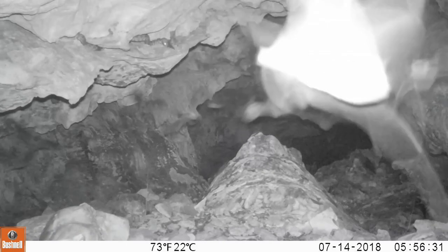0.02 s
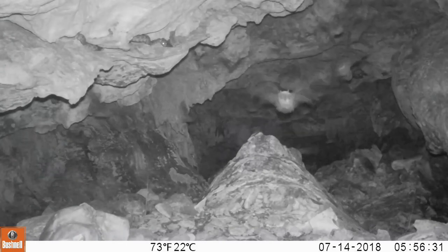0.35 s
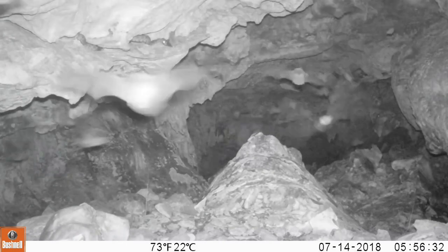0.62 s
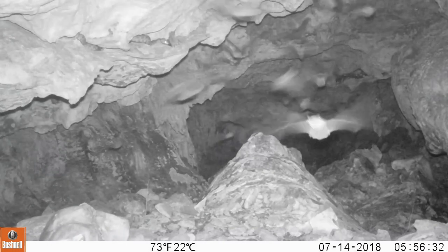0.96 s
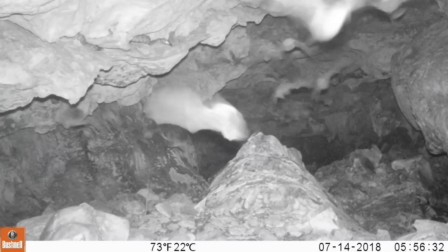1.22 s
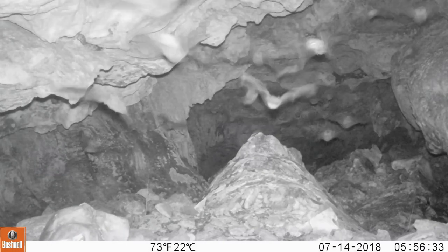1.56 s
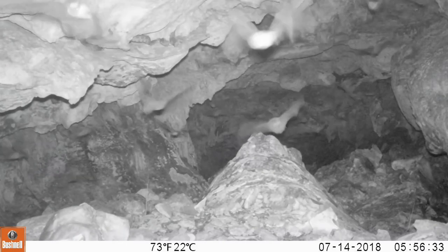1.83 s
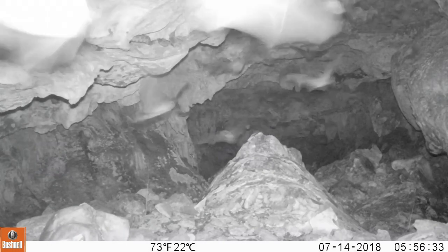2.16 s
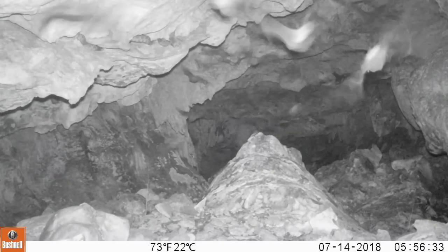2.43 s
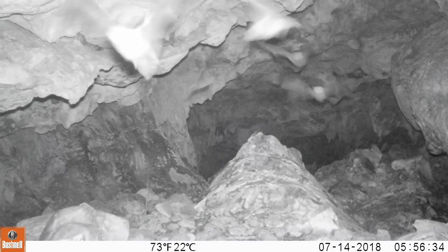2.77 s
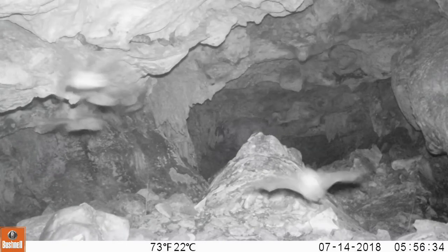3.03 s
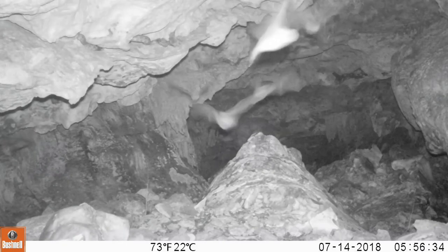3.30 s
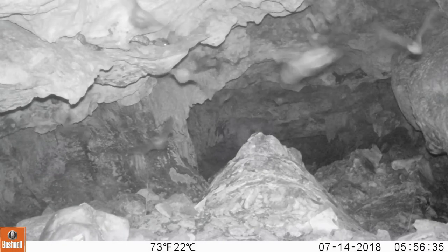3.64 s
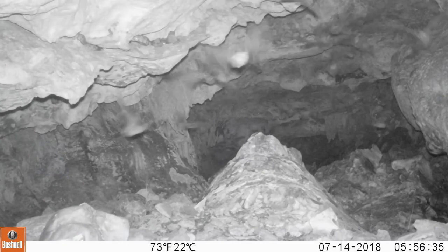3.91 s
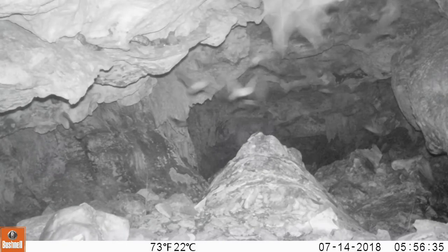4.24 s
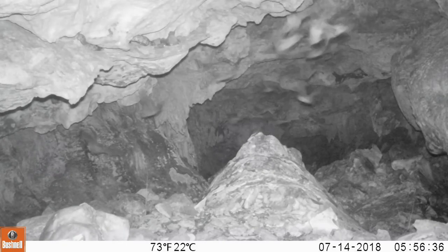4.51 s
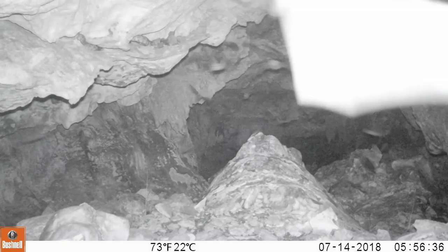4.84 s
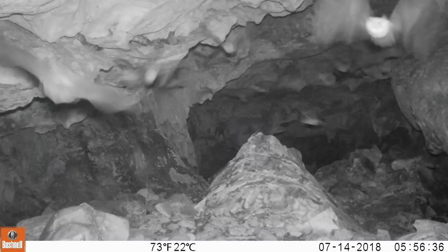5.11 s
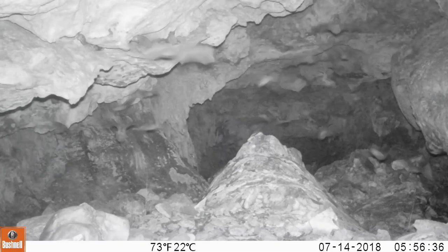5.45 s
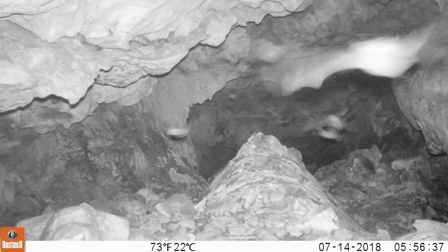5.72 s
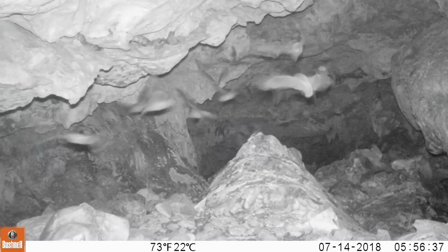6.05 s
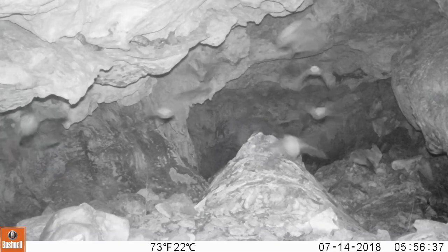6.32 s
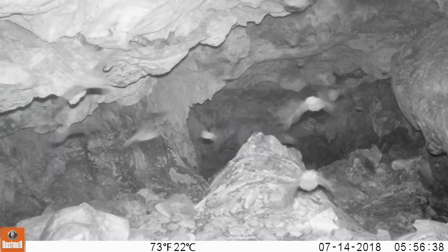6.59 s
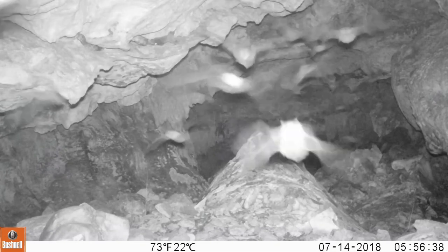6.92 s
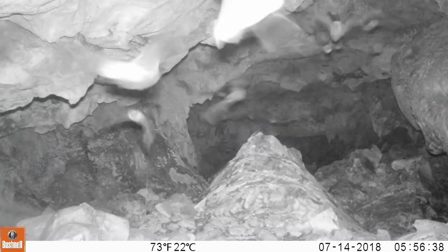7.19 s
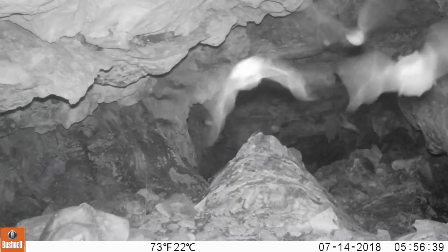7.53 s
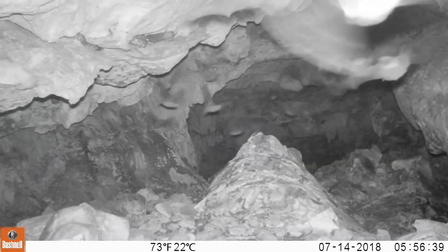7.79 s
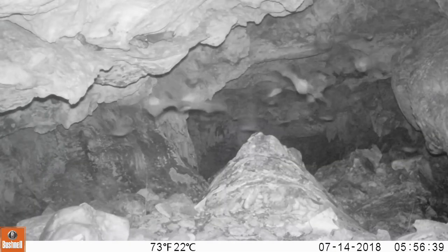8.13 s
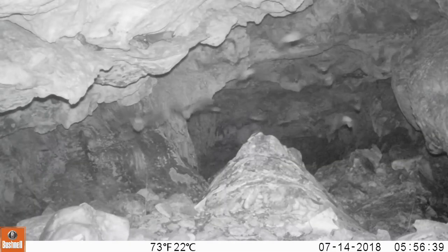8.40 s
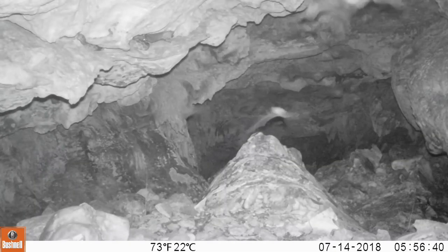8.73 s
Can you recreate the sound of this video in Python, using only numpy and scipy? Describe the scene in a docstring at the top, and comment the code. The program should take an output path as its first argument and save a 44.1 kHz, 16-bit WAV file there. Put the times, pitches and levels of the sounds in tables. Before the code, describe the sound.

Bats fly past a small microphone in a cave for about nine seconds. From the start, each close pass is a quick train of bright, papery swishes that swells and fades, with dry snaps of wing skin, over the fluttering rush of a more distant flock. The passes are dense through the first 3 seconds, ease briefly, then return around 4.3 to 5.8 seconds and 6.2 to 7.5 seconds. Between 0.6 and 1.3 seconds one bat makes a run of eight sharp clicks. Thin high ticks and faint chirping pips come and go afterwards. Two loud, very short falling squeaks stand out at 3.7 and 7.6 seconds. The flock thins after about 8 seconds, with a few softer passes. The rock adds a brief, close ring, and a low rumble of moving air and steady microphone hiss lie underneath throughout.

```python
"""Inside a rock chamber, a small trail camera stands close to a stream of bats.
From the start, bats pass near the microphone, each beating a short train of swishes; some wings snap
taut. Around 1 s one bat clicks, then thin ticks and pips from the roost come and go. Two loud squeaks
sound at 3.7 s and 7.6 s, and the flutter of the flock further off thins towards the end.
The rock rings briefly; low moving air and the hiss of the microphone lie under it all."""
import sys
import numpy as np
from scipy import signal
from scipy.fft import rfft, irfft
from scipy.io import wavfile
from scipy.ndimage import uniform_filter1d

SR = 44100
rng = np.random.default_rng(int(sys.argv[2]) if len(sys.argv) > 2 else 0)


def wav_record(signal):
    """Record a signal, one row per channel, as 16-bit PCM in the file named by sys.argv[1]."""
    frames = np.transpose(np.atleast_2d(signal))
    bounded = np.clip(frames, -1, 1)
    # unit amplitude maps onto the largest positive 16-bit level
    quanta = np.round(bounded * 32767).astype(np.int16)
    wavfile.write(sys.argv[1], SR, quanta)


N = 390726
TIME = np.arange(N) / SR
# spectrum of a wing close to the microphone: frequency_hz, density_db
NEAR_WING = [(40, -18), (150, 0), (430, -10), (620, -6), (850, -8.5), (1300, -7), (1900, -12), (3100, -7.5),
             (4400, -7), (6500, 2), (8000, -2), (10000, -5), (12000, -13.5), (15300, -34)]


def passes(crinkle_db=2.7, patchy_db=4.5, crest=.36, uneven_db=.6, beats_each_side=4):
    """A bat beats steadily past the microphone: swells of rushing air, grainy where the skin crinkles."""
    # close bats: nearest_s, wingbeats_per_s, time_to_3_db_down_s, stroke_s, level_db, puff_db, edge_db
    close_bats = [(0.021, 14.1, 0.05, 0.052, -51.0, 0.0, -1.0), (0.083, 11, 0.05, 0.04, -55.0, 5.5, 1.0),
                  (0.43, 11, 0.04, 0.05, -54.0, 6.0, -1.5), (0.556, 12.5, 0.03, 0.052, -49.0, -2.0, 3.5),
                  (1.058, 14.5, 0.05, 0.052, -56.5, 4.5, 0.0), (1.506, 8.7, 0.05, 0.04, -46.5, -5.0, -9.0),
                  (1.728, 12, 0.04, 0.028, -52.5, -3.5, -1.5), (1.957, 13.1, 0.12, 0.042, -59.0, 4.5, 2.5),
                  (2.462, 13, 0.04, 0.028, -49.0, -2.5, -10.0), (2.656, 14.5, 0.12, 0.038, -47.0, 0.0, 0.5),
                  (2.775, 9.9, 0.05, 0.026, -52.0, 6.5, 1.5),
                  (3.146, 10.3, 0.02, 0.028, -46.5, -4.5, -10.0), (4.1, 12, 0.03, 0.04, -57.0, -7.5, -7.0),
                  (4.428, 12.1, 0.03, 0.052, -52.5, 6.5, -2.0), (4.93, 10.9, 0.12, 0.033, -54.0, 0.0, -3.5),
                  (5.025, 14, 0.04, 0.04, -54.5, -1.0, 0.5), (5.737, 14.5, 0.05, 0.04, -51.5, 1.5, 2.0),
                  (6.203, 14.1, 0.05, 0.052, -57.0, 5.0, -8.0),
                  (6.369, 8.5, 0.05, 0.052, -55.0, -1.5, -3.5), (6.555, 11, 0.03, 0.025, -58.5, 9.0, 0.0),
                  (6.856, 14.5, 0.03, 0.042, -56.5, 6.5, 10.0), (7.056, 13, 0.03, 0.03, -59.5, 5.5, 9.5),
                  (7.19, 14.5, 0.05, 0.042, -59.0, 2.0, 4.5), (7.228, 11.9, 0.03, 0.052, -58.5, 2.5, 7.0),
                  (7.455, 12.1, 0.05, 0.052, -50.5, 0.0, -3.5),
                  (8.128, 14.1, 0.05, 0.052, -65.0, 12.0, 9.0),
                  (8.421, 11.1, 0.03, 0.033, -55.5, -1.5, -2.0),
                  (8.741, 13.1, 0.015, 0.052, -61.0, 1.0, 8.5)]
    power = np.zeros((3, N))
    beats = np.arange(-beats_each_side, beats_each_side + 1)
    for nearest_s, rate, near_s, stroke_s, *levels in close_bats:
        progress = np.linspace(0, 1, int(stroke_s * SR))
        arch = np.sin(np.interp(progress, [0, crest, 1], [0, np.pi / 2, np.pi]))
        stroke = band_gains(*levels)[:, None] * unit(abs(arch) ** 1.1)
        for offset_s, effort in zip(beats / rate, rng.standard_normal(len(beats))):
            distance = np.hypot(1, offset_s / near_s)  # 1 at the nearest point
            if nearest_s + offset_s > 0:
                swell = stroke * amp(uneven_db * effort) / distance
                add(power, nearest_s + offset_s - stroke_s / 2, swell ** 2)
    air = unit(rng.standard_normal(N) * amp(crinkle_db * wander(300)))
    return dapple(wing_tone(np.sqrt(power) * air, NEAR_WING), patchy_db)


def snaps(gain_db=-1.0, colour_spread_db=7.0, soft_count=45):
    """Slack wing skin pulls taut with a dry crack: loud ones close by, soft ones all through the flock."""
    # the loudest snaps of a wing membrane: start_s, level_db, puff_db, edge_db
    close_snaps = [(0.0827, -44, 3, -8), (0.1211, -44.5, -7, 0), (0.403, -43, 2, -10),
                   (0.5008, -40, -6, 0.5), (0.758, -45, -20, -10), (2.1274, -47, -1.5, -4),
                   (2.3725, -45.5, 5, -7), (2.5056, -47, 3, -7), (2.5155, -43.5, -12, -3),
                   (2.5816, -42, 1, -3), (2.6845, -40, -2, -20), (2.7655, -49.5, 3, -3),
                   (2.7908, -41, -14, -12), (3.1355, -45, 1, -5), (3.7862, -45, -10, -24),
                   (4.32, -37, -15, -15), (4.4106, -43, -1, -10), (4.4553, -39.5, -9, -15),
                   (4.704, -44.5, 2, -3), (4.9087, -45.5, -10, -13), (5.003, -42, 0.5, -10),
                   (5.025, -44, -13, -5), (5.035, -43.5, -15, -10), (5.094, -42.5, -7.5, -10),
                   (5.1941, -48, -7, 1), (5.44, -48, -10, -10), (5.6, -42.5, -9, -4),
                   (5.672, -47.5, 9, -12), (6.014, -64, 24, 13), (6.8702, -39.5, -12, -5),
                   (7.4716, -37.5, -20, -0.5), (7.6929, -42.5, 1.5, -26), (8.044, -66, 21, 0),
                   (8.111, -59, 19, -3)]
    when, size, puff, edge = rng.random((soft_count, 4)).T
    when = when * N / SR
    soft_db = throng(when)[0] + 3.0 + 4.5 * size  # just above the flock's rustle
    puff_db = -1.0 + colour_spread_db * (2 * puff - 1)
    edge_db = 3.0 + colour_spread_db * (2 * edge - 1)
    bands = np.zeros((3, N))
    for start_s, *levels in close_snaps + list(zip(when, soft_db, puff_db, edge_db)):
        add(bands, start_s + .0005, band_gains(*levels)[:, None] * crack(spike=1.36))
    return amp(gain_db) * wing_tone(bands, NEAR_WING)


def squeaks(harmonics=4):
    """A short falling cry turns raspy at its end; harmonics flare as they cross the throat's resonances."""
    # cries: start_s, length_s, first_pitch_hz, last_pitch_hz, level_db, overtones_db, end_jitter_ratio
    cries = [(3.7336, 0.0181, 2450, 1970, -33, 5.0, .09), (7.5798, 0.0163, 2282, 1930, -36, -0.5, .06),
             (5.303, 0.021, 2290, 1950, -54.5, -22, .15), (1.375, 0.019, 2200, 1900, -54.5, -20, .15)]
    # resonances of a bat's throat: centre_hz, width_hz, gain_db
    resonances = [(2325, 320, 5), (4000, 460, 3), (6630, 1600, -9.5), (8800, 1200, -22)]
    out = np.zeros(N)
    for start_s, length_s, first_hz, last_hz, db, overtones_db, rasp in cries:
        progress = np.linspace(0, 1, int(length_s * SR))
        pitch = first_hz + (last_hz - first_hz) * (2 * progress + progress ** 5) / 3
        jitter = (.005 + rasp * progress ** 4) * wander(1200)[:len(progress)]
        phase = 2 * np.pi * np.cumsum(pitch * (1 + jitter)) / SR
        cry = 0
        for k in range(1, harmonics + 1):
            throat = sum(amp(gain_db) / (1 + (2 * (k * pitch - hz) / width) ** 2)
                         for hz, width, gain_db in resonances)
            cry = cry + throat * amp(overtones_db * (k > 1)) * np.sin(k * phase)
        add(out, start_s, amp(db) * unit(cry * signal.windows.tukey(len(progress), .4)))
    return out


def clicks(gain_db=-1.0, echo_s=.0165, echo_db=-5.5, fall=.12, length_s=0.0075, harmonics=8):
    """Sharp calls, a falling stack of harmonics in noise, each thrown back once by a rock face."""
    # clicks of a bat sounding its way: start_s, pitch_hz, level_db
    calls = [(0.6306, 1566, -52.5), (0.7162, 1594, -51), (0.781, 1913, -43.5), (0.8642, 2100, -45),
             (0.9628, 2120, -48), (1.1199, 1562, -40.5), (1.216, 1490, -48), (1.3052, 1720, -51)]
    # tone colour of a click: frequency_hz, gain_db
    spectrum = [(500, -33), (1200, -11), (1800, -3.5), (3000, -5), (4500, -5.5), (7000, 3), (10000, -0.5),
                (13000, -7.5), (15300, -21)]
    out, t = np.zeros(N), np.arange(int(length_s * SR)) / SR
    for start_s, hz, db in calls:
        phase = 2 * np.pi * np.cumsum(hz * (1 + fall * (.3 - t / length_s))) / SR
        for delay_s, path_db, decay_s in ((0, 0, .0017), (echo_s, echo_db, .0024)):
            stack = unit(sum(np.sin(k * phase + 2 * np.pi * rng.random()) for k in range(1, harmonics + 1)))
            call = (stack + rng.standard_normal(len(t))) * t * np.exp(-t / decay_s)
            add(out, start_s + delay_s, amp(db + path_db) * unit(call))
    return amp(gain_db) * colour(out, spectrum)


def ticks(gain_db=1.5, body_db=-13.0, low_db=-15.0):
    """Dry ticks with nearly all their strength in the top of the treble."""
    # thin ticks, probably the top end of sonar calls: start_s, level_db
    sonar = [(1.4765, -41.5), (1.714, -43), (1.809, -45), (1.872, -46), (3.2307, -43), (3.584, -44),
             (4.615, -44), (4.8314, -45), (5.7723, -39), (6.739, -43)]
    bands = np.zeros((3, N))
    for start_s, db in sonar:
        add(bands, start_s, amp([db + low_db, db + body_db, db])[:, None] * crack(spike=1.4))
    return amp(gain_db) * wing_tone(bands, NEAR_WING)


def flock(gain_db=-1.2, puff_db=7.5, edge_db=2.2, flap_db=2.0, surge_db=1.0, turn_db=1.2):
    """Further off, many wingbeats overlap: a fluttering rush that changes colour as the wings turn."""
    # spectrum of distant wings: frequency_hz, density_db
    far_wing = [(40, -10.5), (170, -1.5), (420, -8), (620, -8), (850, -12), (1400, -8.5), (1900, -13.5),
                (3200, -9.5), (4500, -14.5), (6500, -6.5), (8000, -11), (9700, -10), (12000, -17),
                (15300, -38)]
    rustle, puffs = throng(TIME)
    gains = amp([puffs + puff_db, rustle, rustle + edge_db])
    rush = unit(rng.standard_normal(N) * amp(flap_db * wander(55) + surge_db * wander(6)))
    turning = amp(turn_db * np.array([wander(50) for _ in gains]))
    flutter = dapple(wing_tone(gains * turning * rush, far_wing), depth_db=2.5)
    return amp(gain_db) * flutter + crackle(gains[1])


def throng(times_s):
    """The distant flock thickens and thins: its rustle and puff levels in dB at the given times."""
    # strength of the flock: time_s, rustle_db, puff_db
    levels = [(0, -54, -61.5), (.2, -56.5, -62), (.6, -55, -65), (.8, -57.5, -67.5), (1.45, -57.5, -67),
              (2.25, -60, -68), (2.6, -56, -63), (2.95, -61, -67), (3.55, -61.5, -68), (3.95, -62, -68.5),
              (4.85, -56.5, -65.5), (5.5, -59.5, -68.5), (5.8, -59, -67), (6.7, -62, -69.5),
              (7.3, -59.5, -66.5), (7.85, -63, -68.5), (8.6, -68, -71.5), (8.86, -65, -71)]
    when, *columns = np.transpose(levels)
    return [np.interp(times_s, when, column) for column in columns]


def crackle(rustle_gain, gain_db=-7.0, per_s=120, spread_db=5.0, decay_s=.0022, band_count=10):
    """Tiny flicks of distant wings, each bright in its own part of the treble."""
    out = np.zeros(N)
    for hz in np.geomspace(5500, 11500, band_count):
        sizes = amp(spread_db * np.minimum(rng.exponential(1, N), 2))
        flicks = sizes * (rng.random(N) < per_s / band_count / SR)
        dying = signal.lfilter([1], [1, -np.exp(-1 / (decay_s * SR))], flicks)
        band = signal.butter(2, [hz * .87, hz * 1.13], "bandpass", fs=SR)
        out += signal.lfilter(*band, dying * rng.standard_normal(N)) / hz
    return amp(gain_db) * rustle_gain * unit(out)


def pips(length_s=0.0063, fall=0.29, roost_db=-13.5, roost_hz=3130, spread_db=9.0, faint_count=1000):
    """Quick downward chirps: a few clear ones in faint twitter, which grows as the flock thickens."""
    # the clearest pips from the roost: centre_s, pitch_hz, level_db
    clear_pips = [(1.741, 3180, -56.5), (1.878, 3090, -55), (1.959, 3000, -55), (3.427, 3260, -60),
                  (4.182, 3050, -60), (4.245, 3300, -61), (4.909, 3460, -54), (5.189, 3250, -56.5),
                  (7.114, 3280, -57), (7.356, 3650, -56), (8.354, 3800, -60), (8.373, 3840, -61)]
    out, progress = np.zeros(N), np.linspace(0, 1, int(length_s * SR))
    when, pitch, far = rng.random((faint_count, 3)).T
    when = when * N / SR
    faint_db = throng(when)[0] + roost_db - spread_db * far
    faint_pips = zip(when, roost_hz * (.8 + .4 * pitch), faint_db)
    for centre_s, hz, db in clear_pips + list(faint_pips):
        chirp = np.sin(2 * np.pi * np.cumsum(hz * (1 + fall * (.5 - progress))) / SR)
        add(out, centre_s - length_s / 2, amp(db) * unit(chirp * np.sin(np.pi * progress)))
    return out


def walls(x):
    """The rock faces nearest the microphone each return one early echo."""
    # echoes: delay_s, gain
    echoes = [(.0047, 0.24), (.0098, -0.13), (0.0236, 0.043)]
    out = np.zeros(N)
    for delay_s, gain in echoes:
        add(out, delay_s, gain * x)
    return out


def cave(x, size=16000, spacing=16):
    """Dense reflections from near rock make a short ring that dies first around 2 kHz."""
    # ring of the chamber: frequency_hz, t60_s
    ring = [(200, 0.27), (2200, .12), (6500, 0.15), (14000, 0.27)]
    taps = np.zeros(size)
    slots = np.arange(SR // 300, size - spacing, spacing)
    taps[slots + rng.integers(0, spacing, len(slots))] = rng.choice([-1, 1], len(slots))
    hz, t, frames = signal.stft(taps, SR, nperseg=256)
    tail = signal.istft(frames * amp(-60 * t / read(ring, hz)[:, None]), SR)[1]
    return signal.oaconvolve(x, tail / np.linalg.norm(tail))[:N]


def draught():
    """The flock stirs the air into a low rumble."""
    # strength of the draught: time_s, level_db
    levels = [(0, -51.5), (.6, -51), (1.3, -54), (2.2, -53.5), (2.7, -52), (3.2, -55), (4.3, -55.5),
              (4.8, -53.5), (6.6, -54.5), (7.4, -53), (8.1, -54), (8.86, -54.5)]
    # spectrum of the moving air: frequency_hz, density_db
    spectrum = [(15, -7), (28, -1), (48, -0.5), (80, -11), (160, -17.5), (400, -29.5), (1000, -43.5),
                (4000, -83)]
    rumble = unit(colour(rng.standard_normal(N), spectrum))
    return rumble * amp(np.interp(TIME, *np.transpose(levels)))


def microphone_hiss(level_db=-66.0):
    """The microphone's own steady noise."""
    # spectrum of the hiss: frequency_hz, density_db
    spectrum = [(200, 2), (1000, -1), (2000, -7.5), (3500, -11), (4800, -7), (6500, 1.5), (9500, 0),
                (12000, -4), (13500, -14.5), (15300, -14)]
    return amp(level_db) * colour(rng.standard_normal(N), spectrum)


def band_gains(db, puff_db, edge_db):
    """Gains of a wing's low puff of pushed air, its rustling skin and its bright trailing edge."""
    return amp([db + puff_db, db, db + edge_db])


def wing_tone(bands, spectrum):
    """Joins puff, rustle and edge into one sound with the colour of a wing."""
    # where puff, rustle and edge each take over fully: frequency_hz
    anchors_hz = [1400, 6000, 12500]
    hz = np.fft.rfftfreq(N, 1 / SR)
    shares = np.array([read(list(zip(anchors_hz, row)), hz) for row in np.eye(len(bands))])
    return colour(irfft((rfft(bands) * shares).sum(0), N), spectrum)


def dapple(x, depth_db):
    """Sound from moving bats and its echoes off the rock interfere, glinting in patches about a kilohertz wide
    and ten milliseconds long."""
    frames = signal.stft(x, nperseg=256)[2]
    across_pitch = uniform_filter1d(rng.standard_normal(frames.shape), size=6, axis=0)
    patches = unit(uniform_filter1d(across_pitch, size=4, axis=1))
    return signal.istft(frames * unit(amp(depth_db * patches)))[1][:N]


def crack(spike, decay_s=0.004, span_s=0.0075, size=900):
    """A spike and a fast-dying scatter, with the energy of rms 1 held for span_s."""
    burst = rng.standard_normal(size) * np.exp(-np.arange(size) / SR / decay_s)
    burst[0] += spike
    return burst / np.linalg.norm(burst) * np.sqrt(span_s * SR)


def colour(x, spectrum, size=8192):
    """Minimum-phase filter with the given spectrum; white noise keeps its power."""
    hz = abs(np.fft.fftfreq(size, 1 / SR))
    log_gain = np.log(amp(read(spectrum, hz)))
    taps = np.fft.ifft(np.exp(np.conj(signal.hilbert(log_gain)))).real[:size // 2]
    return signal.oaconvolve(x, taps / np.linalg.norm(taps))[:N]


def wander(rate_hz):
    """Smooth random motion of rms 1."""
    hz = np.fft.rfftfreq(N, 1 / SR)
    return unit(irfft(rfft(rng.standard_normal(N)) * np.exp(-(hz / rate_hz) ** 2), N))


def read(points, hz):
    """Reads a table along a log-frequency axis."""
    points_hz, values = np.transpose(points)
    return np.interp(np.log(hz + 1), np.log(points_hz + 1), values)


def add(mix, start_s, sound):
    """Mixes a sound in at a time."""
    part = mix[..., max(round(start_s * SR), 0):][..., :sound.shape[-1]]
    part += sound[..., :part.shape[-1]]


def amp(db):
    """Decibels to gain."""
    return 10 ** (np.asarray(db) / 20)


def unit(x):
    """Scales to rms 1."""
    return x / np.sqrt(np.mean(x ** 2) + 1e-20)


def scene(near_room_db=-11.5, squeak_room_db=-7.5, roost_room_db=-5.0):
    """At one microphone: wings and calls with their reflections, over the flock, draught and hiss."""
    near = passes() + snaps() + ticks() + clicks()
    cries, roost = squeaks(), pips()
    room = cave(amp(near_room_db) * near + amp(squeak_room_db) * cries + amp(roost_room_db) * roost)
    direct = near + cries + roost
    return (direct + walls(direct) + room + flock() + draught() + microphone_hiss())[None]


def record(dry, cutoff_hz=15600):
    """The trail camera cuts off the highest treble."""
    taps = signal.firwin(511, cutoff_hz, window=("kaiser", 9), fs=SR)
    return signal.oaconvolve(dry, taps[None], "same")


dry = scene()
out = record(dry)
wav_record(out)
```